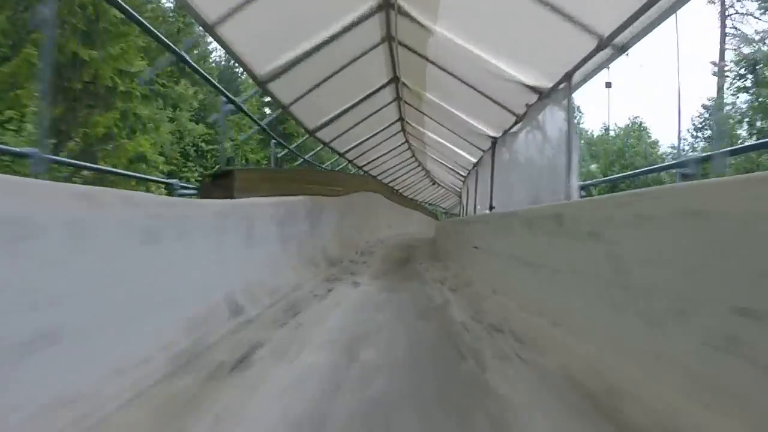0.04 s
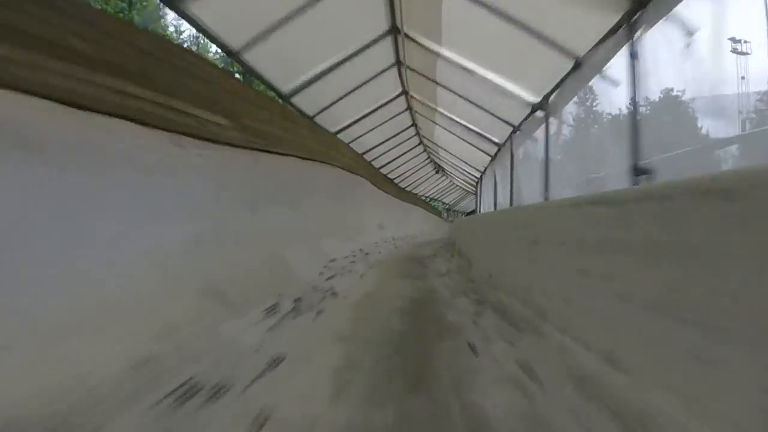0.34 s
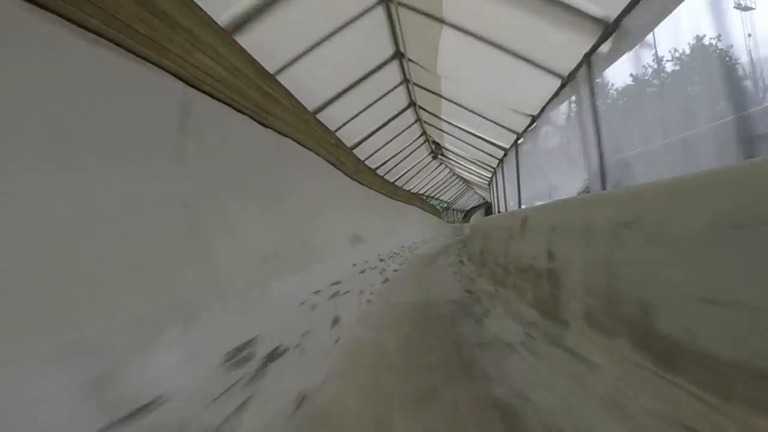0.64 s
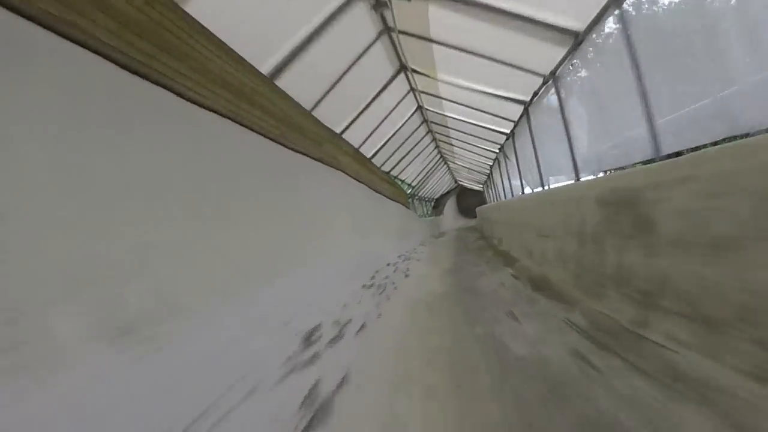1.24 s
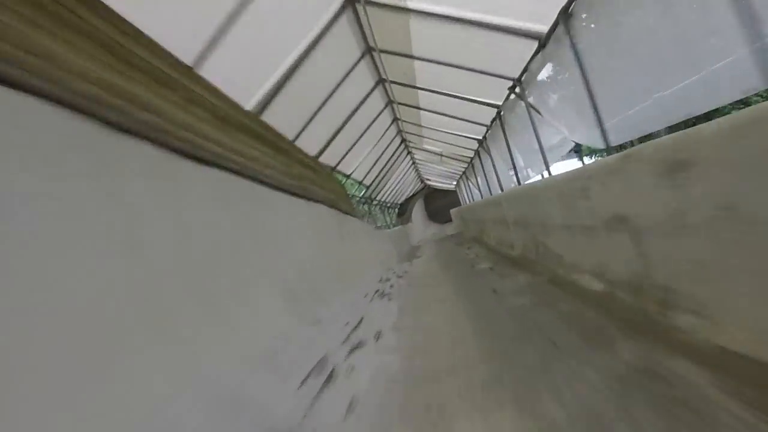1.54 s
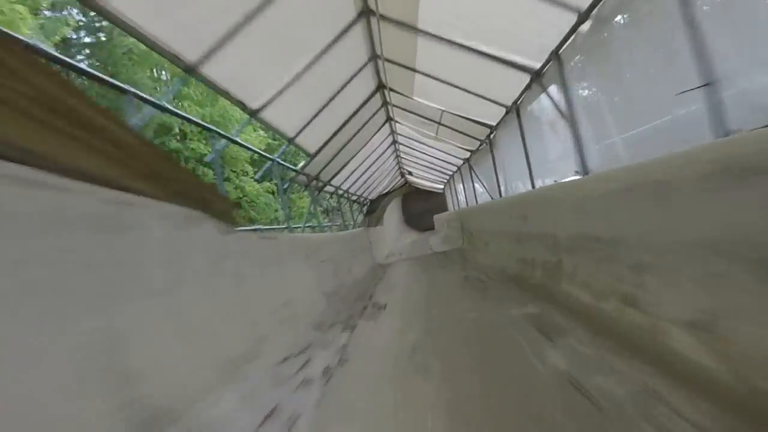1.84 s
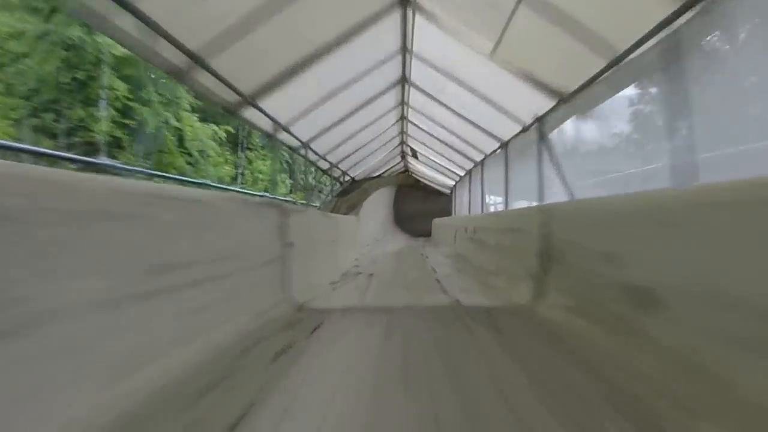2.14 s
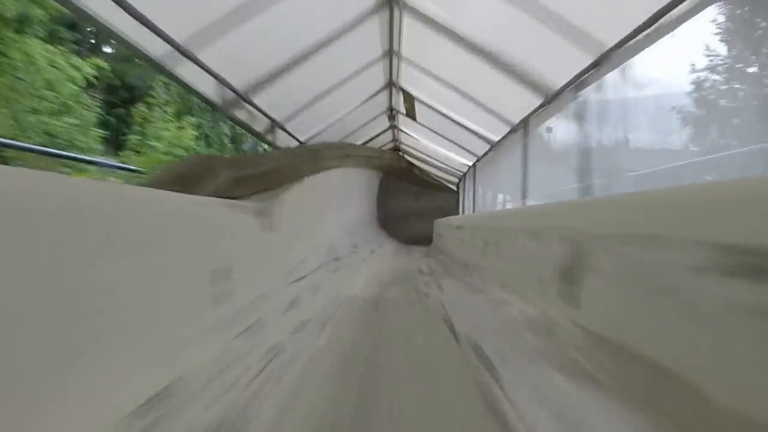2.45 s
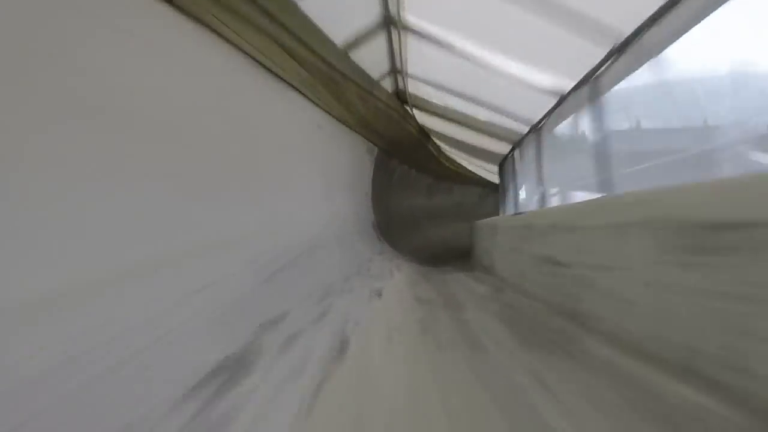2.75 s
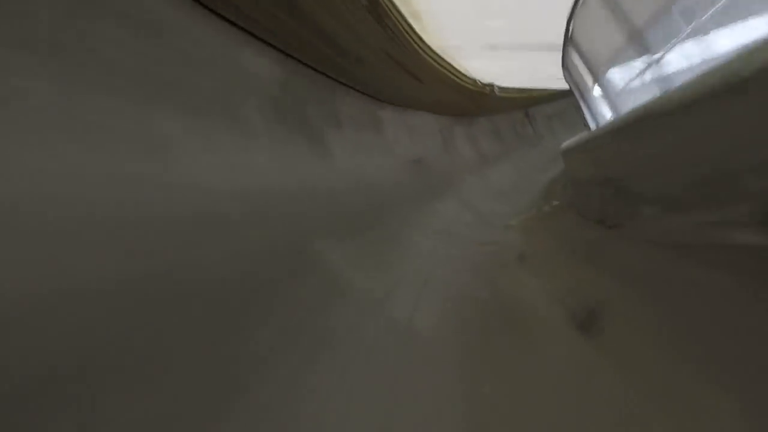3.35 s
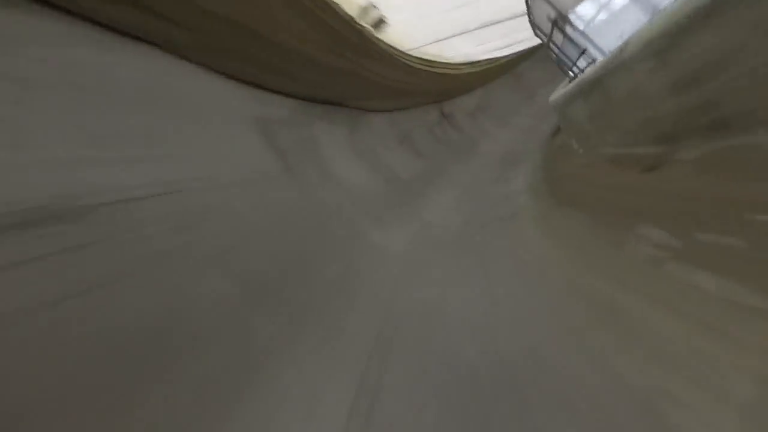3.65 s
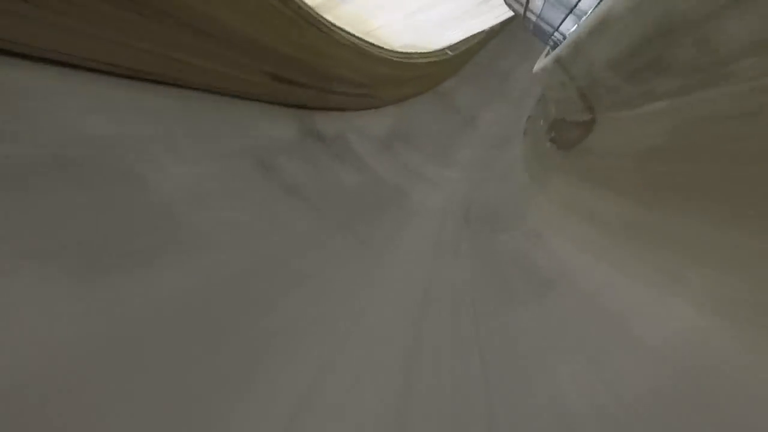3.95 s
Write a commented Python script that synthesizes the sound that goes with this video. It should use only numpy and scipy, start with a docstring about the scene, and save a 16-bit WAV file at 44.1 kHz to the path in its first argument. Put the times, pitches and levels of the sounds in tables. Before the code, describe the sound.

A wheeled bobsled rolls down a concrete track, heard from on board as a continuous low roar with an uneven, throbbing boom and faint air hiss. From about 0.6 seconds, loose fittings clack irregularly and the wheels give brief scrapes. Dull knocks come near 1.4 and 2.5 seconds, the strongest around 3.2. A sharper clatter with a faint metal jingle comes at 2.8, and a stone snaps against the hull near 3.8.

```python
"""Wheels rolling on rough concrete drive a bobsled's hull into a roar and a throbbing boom.
The sled is heard from on board as it runs down a roofed track. Continuous contact forces the
hull's resonances; bumps and the clacks of loose fittings excite them by impact, and the fittings
ring on in their own modes. Slipping wheels scrape, grit ticks against the shell, a small steel
part jingles, and the airstream hisses behind it all."""
import sys
import numpy as np
from scipy.fft import rfft, irfft, next_fast_len
from scipy.io import wavfile
from scipy.ndimage import uniform_filter1d, minimum_filter1d, map_coordinates

SR = 44100
rng = np.random.default_rng(int(sys.argv[2]) if len(sys.argv) > 2 else 0)


def transcribe(u):
    """Save the signal u as a 16-bit wav file named by the first command-line argument.

    u: samples, shape (n,) or (channels, n), limited to [-1, 1]; the rate is SR.
    q: integer samples, one column per channel.
    """
    v = np.clip(np.atleast_2d(u).T, -1, 1)
    q = np.round(v * 32767).astype(np.int16)
    wavfile.write(sys.argv[1], SR, q)


N = 176400
TOP_HZ = 15800


def amp(db):
    """Amplitude ratio of a level in decibels."""
    return 10 ** (np.asarray(db) / 20)


def unit(x):
    """Normalisation to an rms of 1."""
    return x / np.sqrt(np.mean(x ** 2) + 1e-20)


def contour(rows):
    """Linear interpolation of (t/s, level/dB) rows to one level per sample."""
    times, levels = np.transpose(rows)
    return np.interp(np.arange(N) / SR, times, levels)


def wobble(rate):
    """Smooth random modulation: a spline through `rate` Gaussian values a second."""
    return map_coordinates(rng.standard_normal(4096), [np.arange(N) * rate / SR + 2], mode="wrap")


def coloured(x, spectrum, resonances=()):
    """Minimum-phase filtering at unit power gain: a broad spectrum with resonance peaks on it."""
    size = 2 * next_fast_len(N * 3 // 4)
    hz = np.fft.rfftfreq(size, 1 / SR)
    knot_hz, knot_db = np.transpose(spectrum)
    db = np.interp(np.log(hz + 1), np.log(knot_hz + 1), knot_db)
    for centre, width, boost in resonances:
        db = db + boost / (1 + (2 * (hz - centre) / width) ** 2)
    cepstrum = irfft(np.log(unit(amp(db)) + 1e-6))
    cepstrum[1:size // 2] *= 2  # folding the cepstrum makes the response causal
    cepstrum[size // 2 + 1:] = 0
    return irfft(rfft(x, size) * np.exp(rfft(cepstrum)), size)[:N]


def grainy(grain_db, rate):
    """Random amplitude modulation gathers white noise into clumps."""
    return unit(rng.standard_normal(N) * amp(grain_db * np.tanh(wobble(rate) / 2) * 1.96))


def strike(rise_s, t60):
    """Impact envelope of peak 1: a fast rise, then exponential decay of 60 dB in t60 seconds."""
    t = np.arange(SR // 2) / SR
    envelope = (1 - np.exp(-t / rise_s)) * amp(-60 * t / t60)
    return envelope / envelope.max()


def bursts(events, rise_s, t60):
    """Incoherent addition: decaying noise bursts, one per (t/s, level/dB) row, sum in power."""
    envelope = strike(rise_s, t60)
    power = np.zeros(N + SR)
    for onset, db, *_ in events:
        power[round(onset * SR):][:len(envelope)] += (amp(db) * envelope) ** 2
    return np.sqrt(power[:N]) * rng.standard_normal(N)


# Resonances of the hull: f/Hz, bandwidth/Hz, boost/dB
HULL_MODES = [(171, 57, 3.5), (253.7, 21, 5.5), (288, 20, 7), (551.5, 24.4, 12.5), (655, 43, 7),
              (902, 64, 4), (1183, 54, 1.5), (1506, 27, 7), (1638, 91, 7), (1843, 130, 6.5), (1998, 35, 8)]
# Spectrum of the low roar: f/Hz, relative level/dB
ROAR_SPECTRUM = [(90, -26.5), (130, -5.5), (185, -0.5), (222, -5.5), (290, -5), (400, -8.5), (500, -23.5),
                 (1000, -64)]
# Excitation of the low roar: t/s, level/dB
ROAR_DRIVE = [(0.05, -24.5), (0.28, -23), (0.55, -26), (0.8, -17.5), (0.88, -22.5), (1.22, -20),
              (1.44, -27.5), (1.55, -18), (1.77, -24), (2.38, -24.5), (2.46, -22.5), (2.66, -23),
              (2.72, -18), (2.8, -22.5), (2.9, -19.5), (3.6, -22), (3.88, -24), (3.97, -19.5)]
# Spectrum of the shell's rolling noise: f/Hz, relative level/dB
SHELL_SPECTRUM = [(150, -38), (490, -12), (640, -0.5), (900, 1.5), (1400, -8), (2000, -9), (2300, -16),
                  (3100, -12), (3700, -15), (4400, -39.5), (12000, -86.5)]
# Excitation of the shell: t/s, level/dB
SHELL_DRIVE = [(0.04, -31), (0.18, -25), (0.33, -31), (0.55, -27.5), (0.83, -22.5), (0.9, -29),
               (0.94, -22.5), (1.1, -27), (1.32, -24.5), (1.39, -29.5), (1.54, -23), (1.61, -27),
               (1.82, -29), (1.95, -22.5), (2.05, -30.5), (2.16, -26), (2.5, -30), (2.67, -28),
               (2.73, -23.5), (2.95, -25.5), (3.23, -31), (3.38, -25.5), (3.56, -28.5), (3.64, -25.5),
               (3.88, -30.5), (4.0, -21)]
# Contact spectrum of loose fittings, chattering or clacking: f/Hz, relative level/dB
CONTACT_SPECTRUM = [(200, -27), (800, -4), (2000, -1), (3300, 3.5), (3800, -5), (4400, -22), (5600, -23.5),
                    (11000, -47), (15000, -81.5)]

def rolling():
    """Forced vibration: wheels on rough concrete shake the hull and set its fittings chattering."""
    shell_db = contour(SHELL_DRIVE)
    jolt_db = wobble(rate=35)
    chatter_db = -37.5 + 0.58 * (shell_db - shell_db.mean())  # partly follows the shell
    roar = grainy(grain_db=2, rate=60) * amp(contour(ROAR_DRIVE))
    shell = grainy(grain_db=2, rate=300) * amp(shell_db + jolt_db)
    chatter = grainy(grain_db=6, rate=150) * amp(chatter_db + jolt_db)
    return (coloured(roar, ROAR_SPECTRUM, HULL_MODES)
            + coloured(shell, SHELL_SPECTRUM, HULL_MODES)
            + coloured(chatter, CONTACT_SPECTRUM, HULL_MODES))


# Gaussian swells of the hull's boom: centre t/s, duration/s, level/dB
BOOM_THROBS = [(0.019, 0.14, -7.5), (0.181, 0.086, -9.5), (0.321, 0.057, -5.5), (0.701, 0.15, -18),
               (1.09, 0.15, -11.5), (1.259, 0.094, -8), (1.417, 0.11, -9.5), (1.651, 0.14, -9.5),
               (1.846, 0.23, -14.5), (2.068, 0.22, -12), (2.311, 0.085, -9), (2.449, 0.021, -14.5),
               (2.672, .11, -10), (2.802, 0.097, -12), (3.218, .05, -13), (3.517, 0.076, -10),
               (3.74, 0.25, -14)]
# Spectrum of the rumble: f/Hz, relative level/dB
RUMBLE_SPECTRUM = [(15, -8.5), (40, -9), (60, 4), (78, 1.5), (112, 0), (135, -11.5), (300, -79)]

def boom():
    """Resonance: the hull's lowest mode throbs and wanders in pitch over a broad rumble."""
    mode_hz, wander_hz = 85.07, 4.7
    rest_db, flutter_db, rumble_db = -20, 2.5, -18
    t = np.arange(N) / SR
    power = amp(rest_db) ** 2
    for centre, duration, db in BOOM_THROBS:
        power = power + (amp(db) * np.exp(-(2 * (t - centre) / duration) ** 2)) ** 2
    hz = mode_hz + wander_hz * wobble(rate=20)
    mode = np.sqrt(2 * power) * np.sin(2 * np.pi * np.cumsum(hz) / SR)
    flutter = amp(flutter_db * np.tanh(wobble(rate=46)))
    rumble = unit(coloured(rng.standard_normal(N), RUMBLE_SPECTRUM))
    return mode * flutter + amp(rumble_db) * rumble


# Bumps in the track: t/s, level/dB
TRACK_BUMPS = [(1.435, -22), (2.425, -22.5), (2.548, -19), (3.033, -23.5), (3.151, -14.5), (3.163, -21),
               (3.256, -20)]
# Spectrum of a dull knock: f/Hz, relative level/dB
KNOCK_SPECTRUM = [(60, -20), (250, -7), (480, -12), (800, 4.5), (1200, -3.5), (3700, -21.5), (4500, -61.5)]

def knocks():
    """Impact excitation: each bump drives the hull's resonances with a dull burst."""
    return coloured(bursts(TRACK_BUMPS, rise_s=0.003, t60=0.2), KNOCK_SPECTRUM, HULL_MODES)


# Impacts of loose fittings: t/s, level/dB, centre of the ringing f/Hz
FITTING_IMPACTS = [(.603, -19.5, 2500), (.611, -20, 2200), (1, -25.5, 2400), (1.03, -23.5, 3200),
                   (1.297, -28, 3320), (1.309, -23, 3130), (1.533, -23, 2000), (1.756, -19, 3000),
                   (1.962, -21.5, 2680), (1.984, -20.5, 2090), (2.335, -18, 3400), (2.778, -16.5, 2770),
                   (2.805, -19.5, 3170), (3.188, -26.5, 3100), (3.459, -22.5, 2840), (3.959, -32, 3070)]
# Natural frequencies of the metal fittings: f/Hz
FITTING_MODES = [1900, 1973, 2193, 2440, 2940, 3230, 3470, 3680, 3780]

def clacks():
    """Modal superposition: each impact cracks through the hull and rings modes near its pitch."""
    crack_db, ring_db, spread_oct, rise_s = 1, -3.5, 0.24, 0.00074
    contact = bursts(FITTING_IMPACTS, rise_s, t60=0.081)
    crack = amp(crack_db) * coloured(contact, CONTACT_SPECTRUM, HULL_MODES)
    envelope = strike(rise_s, t60=0.11)
    t = np.arange(len(envelope)) / SR
    hz = np.array(FITTING_MODES)[:, None]
    ring = np.zeros(N + SR)
    for onset, db, centre_hz in FITTING_IMPACTS:
        weight = np.exp(-(np.log2(hz / centre_hz) / spread_oct) ** 2)
        weight *= amp(2 * rng.standard_normal(hz.shape))  # 2 dB of scatter per mode
        weight /= np.linalg.norm(weight)
        modes = weight * np.sin(2 * np.pi * (hz * t + rng.random(hz.shape)))
        ring[round(onset * SR):][:len(t)] += amp(db + ring_db) * envelope * modes.sum(0)
    return crack + ring[:N]


# Sideways slips of a wheel: t/s, level/dB, spectral peak f/Hz
WHEEL_SLIPS = [(0.646, -25, 1560), (1.112, -23.5, 1220), (1.666, -20.5, 1215), (2.109, -22.5, 1110),
               (2.818, -21, 1580)]

def scuffs():
    """Sliding friction: a slipping wheel gives a short, rough scrape around one pitch."""
    slope_db_per_oct = -29.5
    scrapes = np.zeros(N)
    for onset, db, peak_hz in WHEEL_SLIPS:
        spectrum = [(f, slope_db_per_oct * abs(np.log2(f / peak_hz))) for f in (20, peak_hz, TOP_HZ)]
        scrapes += coloured(bursts([(onset, db)], rise_s=0.0015, t60=0.088), spectrum)
    return scrapes


# Small stones hitting the shell, and at 1.33 s a brief touch of metal with the same sharp snap: t/s, level/dB
STONE_IMPACTS = [(1.298, -25), (1.33, -24), (2.803, -24.5), (3.7787, -12.5), (3.785, -16)]
# Spectrum of a stone's snap: f/Hz, relative level/dB
STONE_SPECTRUM = [(300, 6.5), (3000, 9.5), (4200, -2), (5800, 0.5), (8000, -13), (16000, -24)]
# Ticks of fine grit: t/s, level/dB
TICK_IMPACTS = [(.872, -43.5), (1.555, -39.5), (1.684, -45.5), (1.86, -43.5), (2.712, -44.5)]
# Spectrum of a bright tick: f/Hz, relative level/dB
TICK_SPECTRUM = [(4000, -37), (8300, 13), (9500, -2), (11500, 3), (15500, -6.5)]

def grit():
    """Brief contact gives a broad spectrum: stones snap and fine grit ticks against the shell."""
    stones = bursts(STONE_IMPACTS, rise_s=0.0002, t60=0.011)
    ticks = bursts(TICK_IMPACTS, rise_s=0.0002, t60=0.007)
    return coloured(stones, STONE_SPECTRUM) + coloured(ticks, TICK_SPECTRUM)


# Touches of a small steel part: t/s, level/dB
STEEL_TOUCHES = [(2.807, -37.5), (2.905, -42.5), (2.94, -41.5), (3.265, -40.5), (3.362, -40)]
# Response of the steel part: f/Hz, relative level/dB
STEEL_SPECTRUM = [(3500, -39.5), (5000, -4), (5400, 10), (5800, -17), (7500, -18.5), (13000, -40.5)]

def jingle():
    """Damped resonance: each touch rings the steel part briefly, near 5.4 kHz."""
    return coloured(bursts(STEEL_TOUCHES, rise_s=0.00051, t60=0.04), STEEL_SPECTRUM)


# Brief dips in the hiss: centre t/s
HISS_DIPS = [3.25, 3.56, 3.86]
# Spectrum of the airstream: f/Hz, relative level/dB
AIR_SPECTRUM = [(500, -8), (3000, 1.5), (6300, -2.5), (7300, -11.5), (10400, -15.5), (12000, -39.5),
                (15000, -49)]

def airstream():
    """Flow noise: a broadband hiss builds up into the first bend and later dips briefly."""
    steady_db, start_drop_db, build_s = -49.5, 4, 1
    dip_db, dip_s = 7.5, 0.054
    t = np.arange(N) / SR
    level_db = steady_db - start_drop_db * np.clip(1 - t / build_s, 0, 1)
    for centre in HISS_DIPS:
        level_db -= dip_db * np.exp(-(2 * (t - centre) / dip_s) ** 2)
    return coloured(grainy(grain_db=2, rate=66) * amp(level_db), AIR_SPECTRUM)


def scene():
    """Linear superposition: the pressures of all sources add in one channel."""
    return (rolling() + boom() + knocks() + clacks() + scuffs() + grit() + jingle() + airstream())[None]


def record(dry):
    """Peak and band limiting: a smoothed gain holds peaks down, then all above TOP_HZ is cut."""
    ceiling_db, hold_s = -3.5, 0.018
    hold = int(hold_s * SR)
    needed_gain = np.minimum(1, amp(ceiling_db) / (np.abs(dry) + 1e-9))
    limited = dry * uniform_filter1d(minimum_filter1d(needed_gain, hold), hold)
    size = next_fast_len(N + SR // 2)
    passband = np.fft.rfftfreq(size, 1 / SR) < TOP_HZ
    return irfft(rfft(limited, size) * passband, size)[..., :N]


dry = scene()
out = record(dry)
transcribe(out)
```